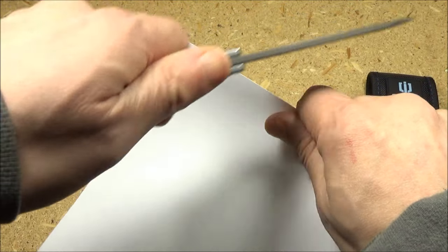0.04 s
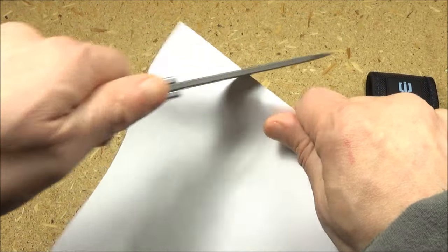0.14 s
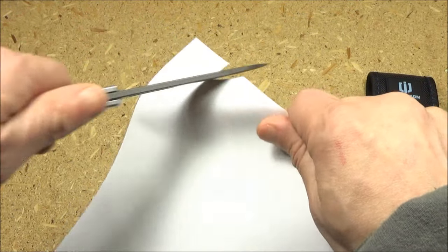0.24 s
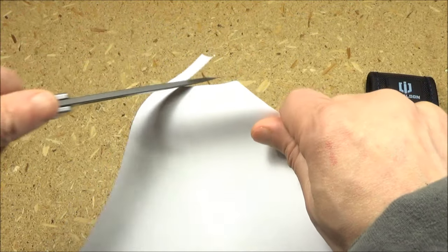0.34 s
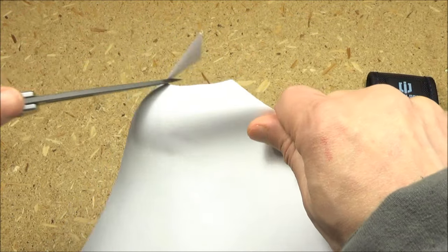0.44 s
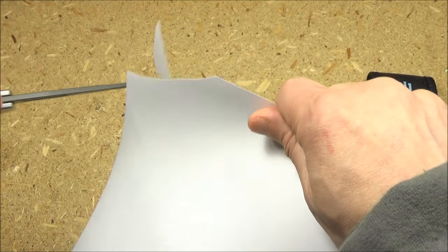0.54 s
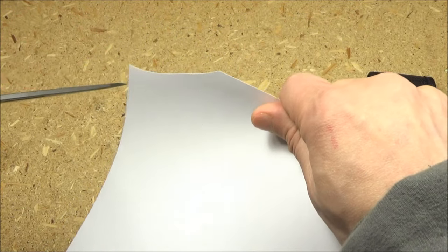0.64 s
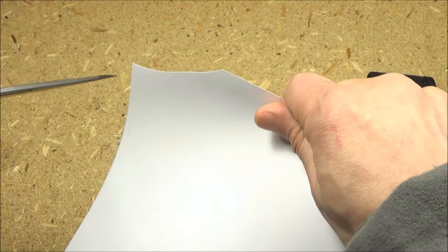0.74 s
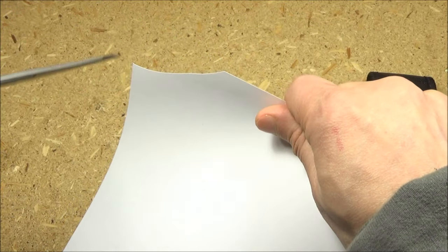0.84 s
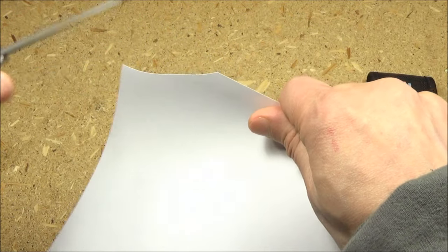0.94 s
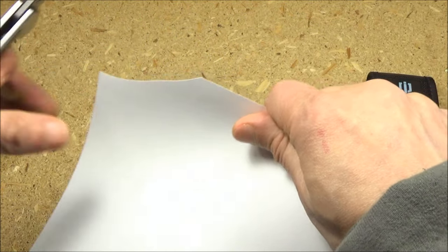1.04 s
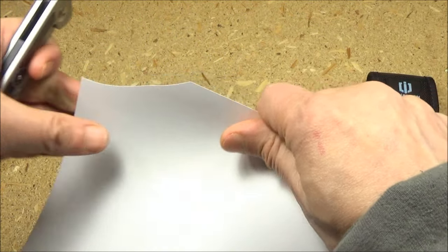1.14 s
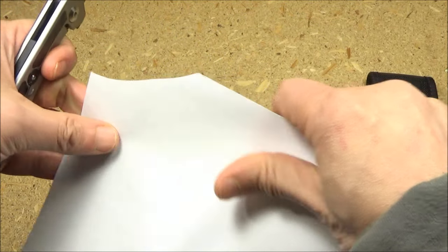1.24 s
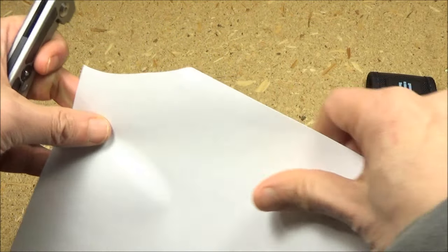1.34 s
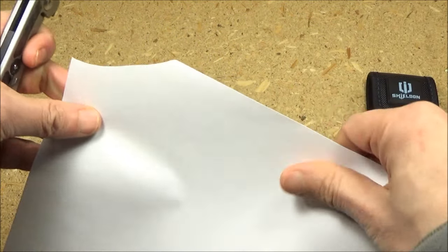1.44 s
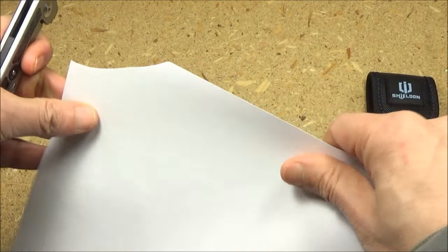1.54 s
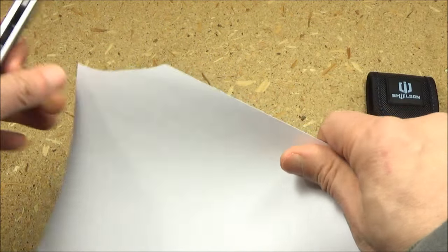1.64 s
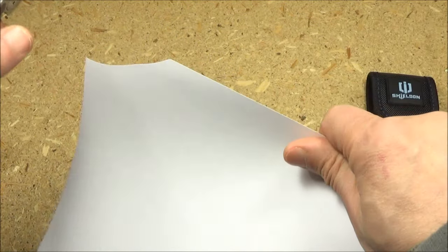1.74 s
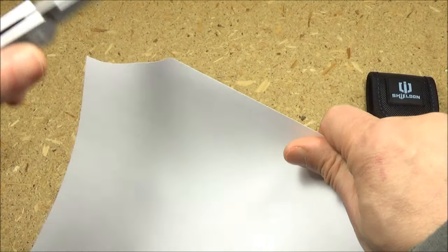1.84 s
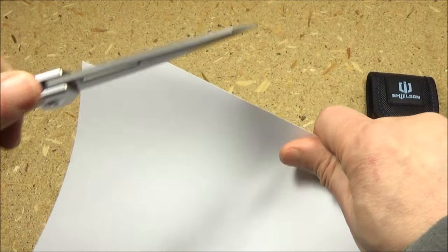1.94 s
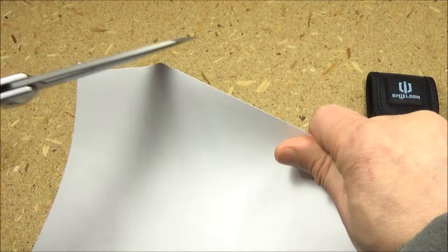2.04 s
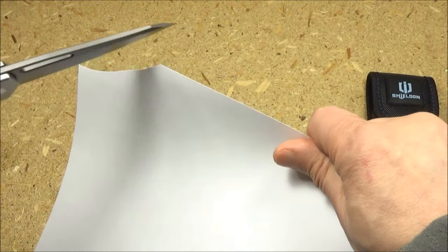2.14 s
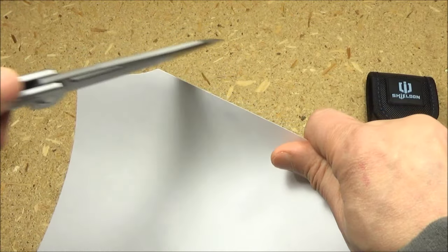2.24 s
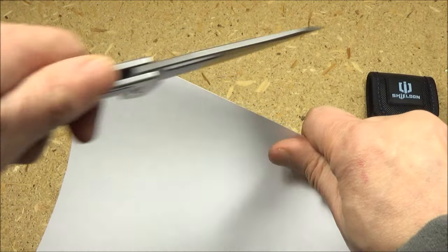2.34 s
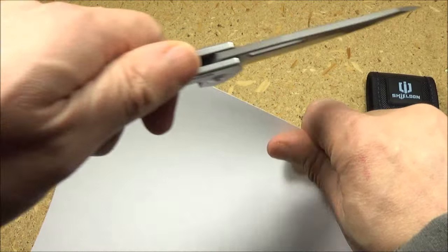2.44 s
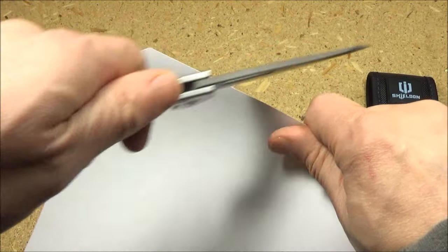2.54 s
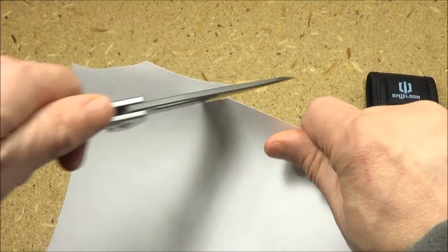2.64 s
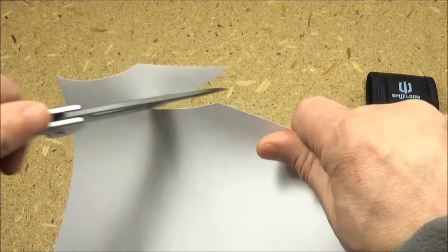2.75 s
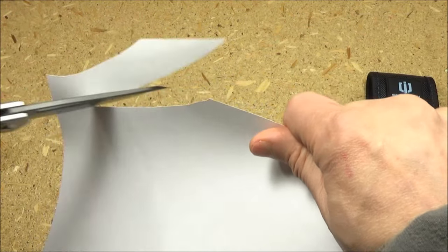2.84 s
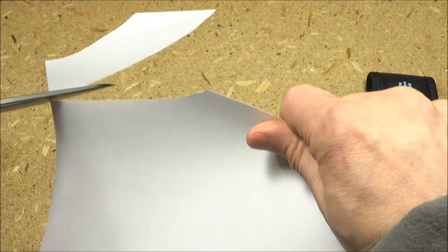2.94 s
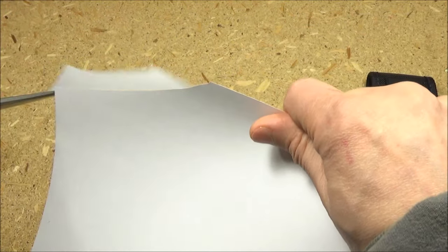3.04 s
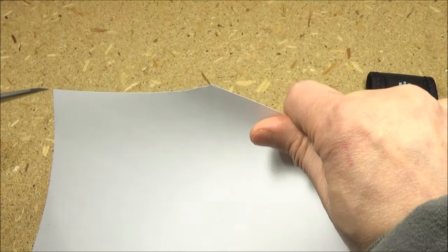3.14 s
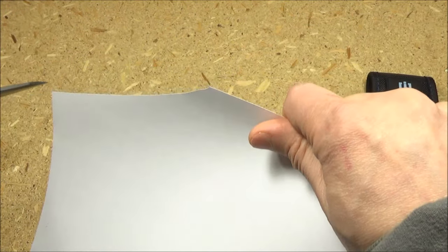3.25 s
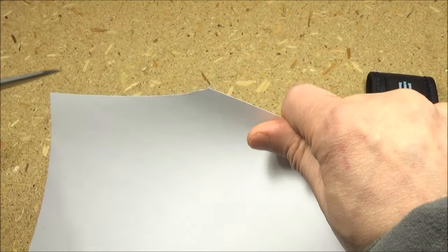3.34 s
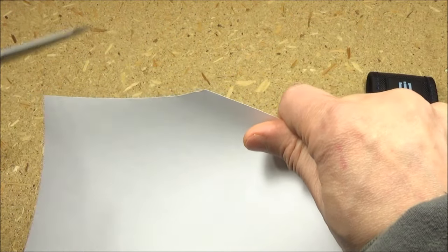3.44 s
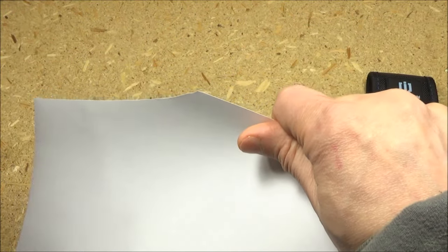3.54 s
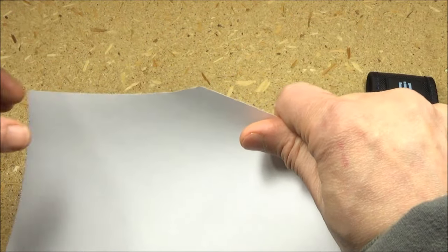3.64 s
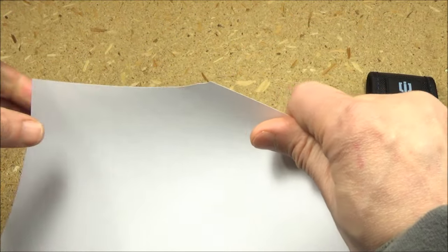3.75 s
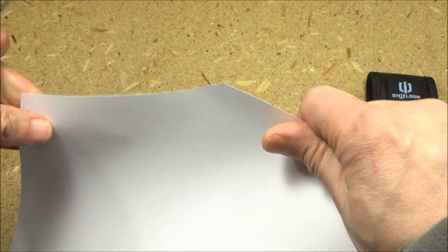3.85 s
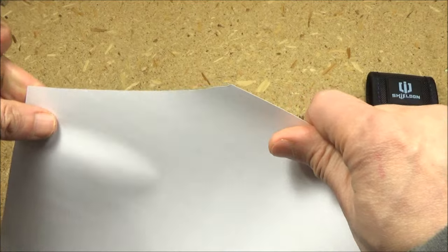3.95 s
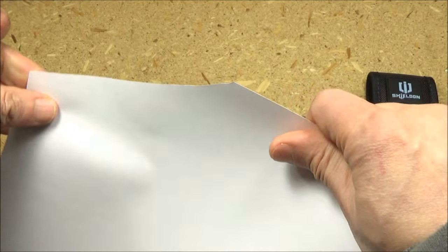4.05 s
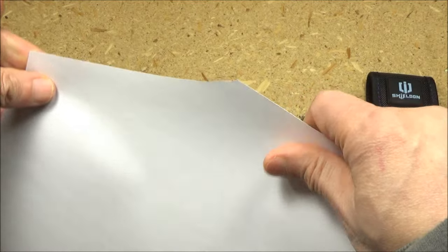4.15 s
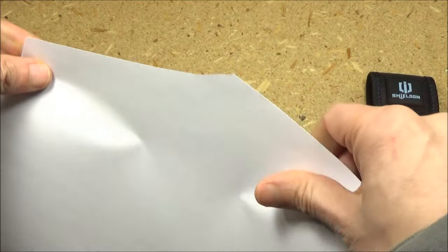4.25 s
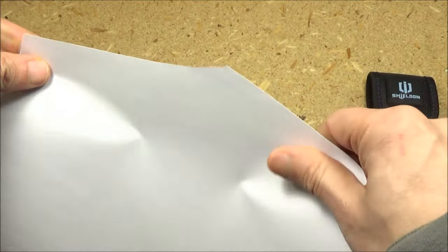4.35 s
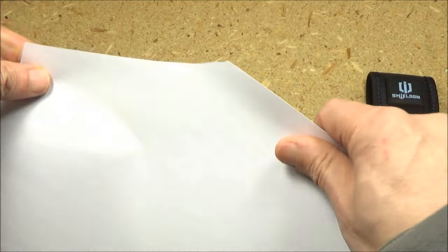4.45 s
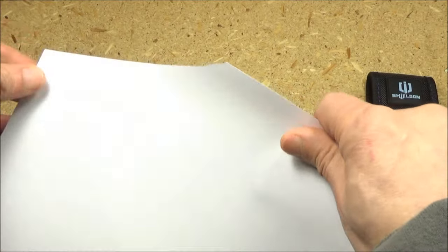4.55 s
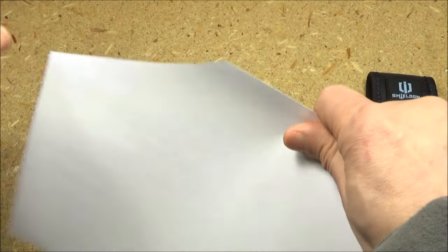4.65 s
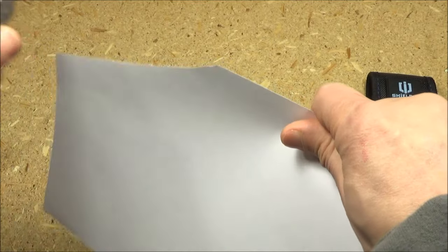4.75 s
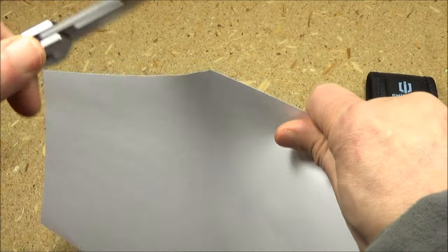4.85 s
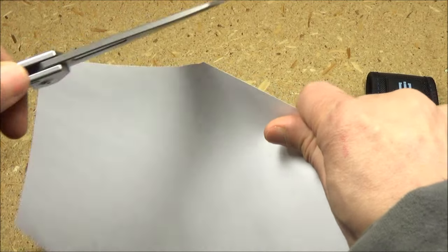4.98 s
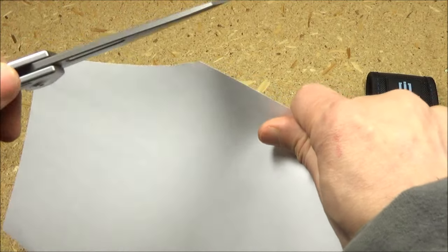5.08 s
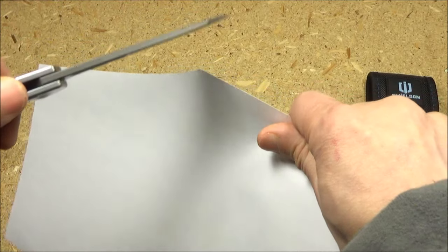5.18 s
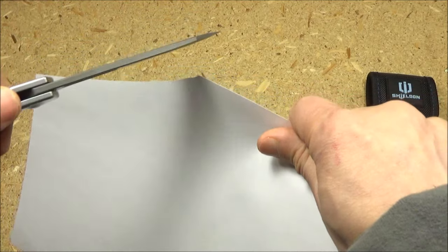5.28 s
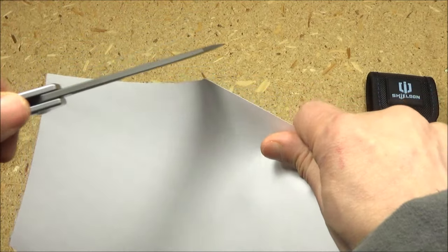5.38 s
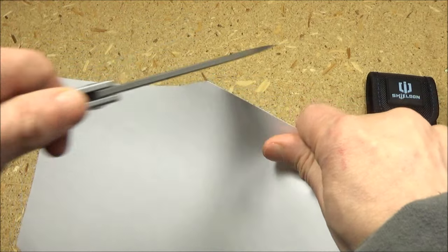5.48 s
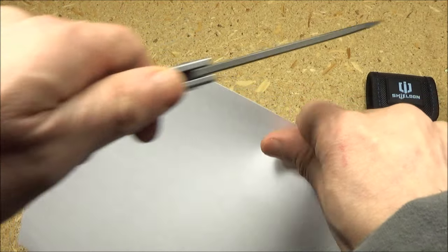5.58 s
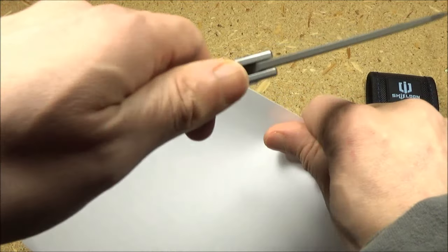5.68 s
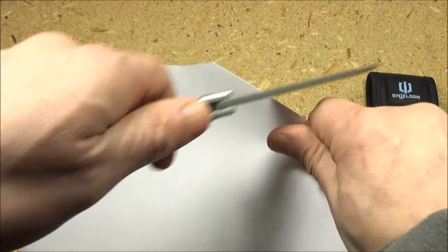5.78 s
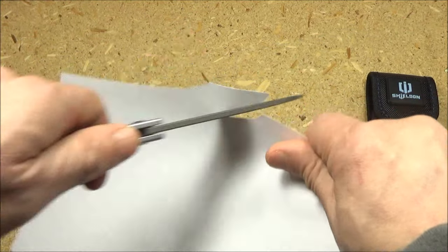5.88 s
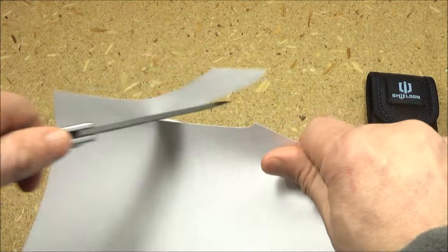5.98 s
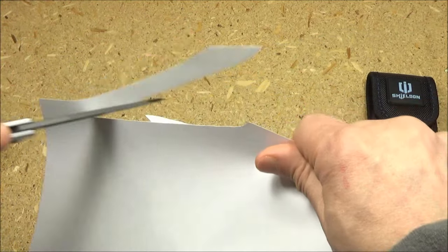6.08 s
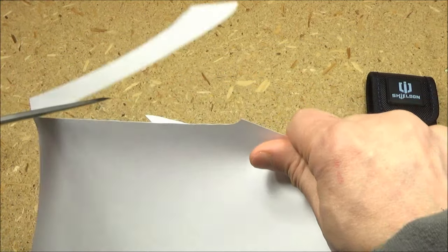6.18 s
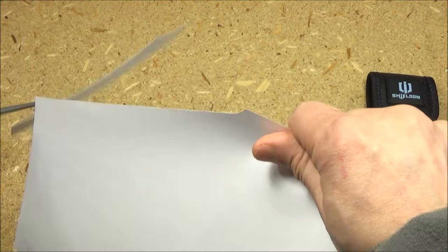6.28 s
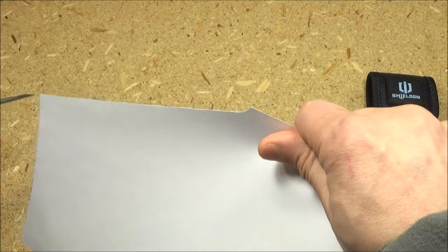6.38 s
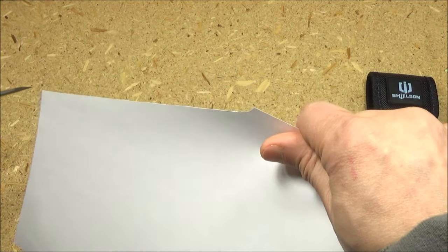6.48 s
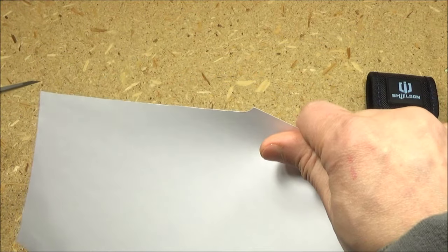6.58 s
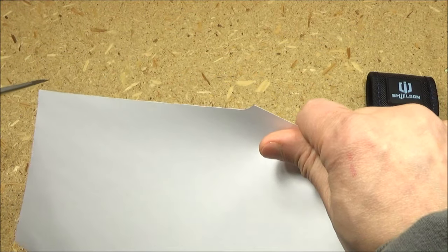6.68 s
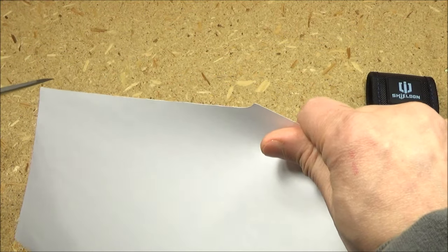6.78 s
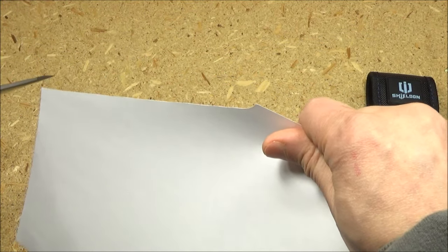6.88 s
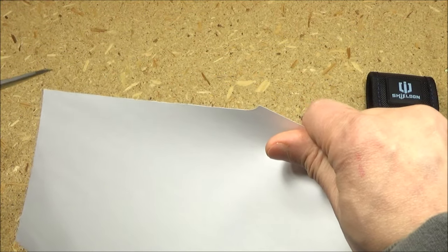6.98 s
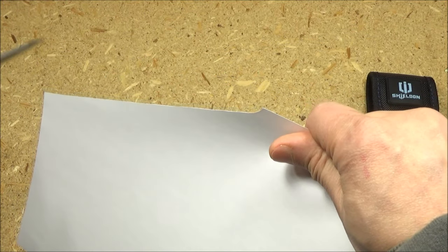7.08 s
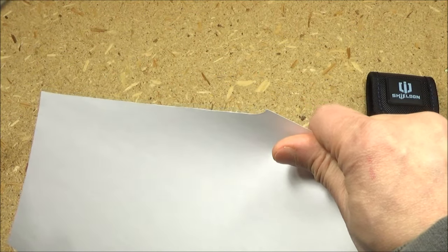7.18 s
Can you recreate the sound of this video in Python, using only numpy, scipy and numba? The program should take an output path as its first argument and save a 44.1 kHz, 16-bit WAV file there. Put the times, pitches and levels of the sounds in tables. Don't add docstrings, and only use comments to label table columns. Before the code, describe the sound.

A knife blade slices a sheet of paper in three crisp, hissing tearing strokes, with rustling, crackling and paper pops between them in a small room.

```python
import sys
import numpy as np
from scipy import signal
from scipy.fft import rfft, irfft, next_fast_len
from scipy.io import wavfile
from scipy.ndimage import uniform_filter1d
from numba import njit

SR = 44100
rng = np.random.default_rng(int(sys.argv[2]) if len(sys.argv) > 2 else 0)


def gain_from_decibels(decibels):
    exponent = np.asarray(decibels, float) / 20
    return 10 ** exponent


def generate_wav(sig):
    pcm = np.round(np.clip(np.atleast_2d(sig).T, -1, 1) * 32767).astype(np.int16)
    wavfile.write(sys.argv[1], SR, pcm)


N = 318402


def rms_one(x):
    return x / np.sqrt(np.mean(x ** 2) + 1e-20)


def in_time(tables, edge_s):
    t, gate = np.arange(N) / SR, 0
    for rows in tables:
        inside_s = np.minimum(t - rows[0][0], rows[-1][0] - t)
        gate = gate + np.clip(inside_s / edge_s + 1, 0, 1)
    s, *columns = np.transpose(np.vstack(tables))
    return np.minimum(gate, 1), [np.interp(t, s, c) for c in columns]


def swells(rows, fall_db_s):
    t = np.arange(0, N + 32, 32) / SR
    start, end, level_db, rise = np.transpose(rows)[:, :, None]
    rising_db = np.abs(rise) * np.maximum(start - t, 0)
    falling_db = fall_db_s * np.maximum(t - end, 0)
    each_db = level_db - rising_db - falling_db
    return np.interp(np.arange(N) / SR, t, np.sqrt(np.sum(gain_from_decibels(2 * each_db), axis=0)))


def drift(rate):
    r = np.exp(-40 * np.pi * rate / SR)
    noise = rng.standard_normal(N // 20 + 2002)
    slow = signal.lfilter([1], [1, -2 * r, r * r], noise)[2000:]
    return np.interp(np.arange(N) / 20, np.arange(len(slow)), rms_one(slow))


def ticks(per_s, spread_db, hiss):
    sizes = gain_from_decibels(spread_db * np.minimum(rng.exponential(1, N), 4)) * rng.choice([-1, 1], N)
    impulses = sizes * (rng.random(N) < per_s / SR)
    return rms_one(rms_one(impulses) + hiss * rng.standard_normal(N))


def colour(x, spectrum, patchy_db, rate, count=3):
    hz, level_db = np.transpose(spectrum)
    bands = int(count * np.log2(hz[-1] / hz[0])) + 1
    edges = np.geomspace(hz[0], min(hz[-1], 19000), bands + 1)
    out = 0
    for k, (low, high) in enumerate(zip(edges, edges[1:])):
        band = signal.sosfilt(signal.butter(2, [low, high], "band", fs=SR, output="sos"), x)
        band_db = np.interp(np.log(low * high) / 2, np.log(hz), level_db)
        out = out + (-1) ** k * band * gain_from_decibels(band_db + patchy_db * drift(rate))
    return rms_one(out)


@njit
def gliding_ring(x, turn, r):
    y = np.zeros(len(x))
    for i in range(2, len(x)):
        y[i] = x[i] - x[i - 2] + 2 * r * np.cos(turn[i]) * y[i - 1] - r * r * y[i - 2]
    return y


# frequency_hz, density_db (per Hz)
ROOM_TONE = [(12, -31), (20, -8.5), (44, -15.5), (84, -10.5), (114, -15), (174, -13.5), (381, -23),
             (415, -18), (534, -28.5), (910, -21), (1430, -32), (6870, -37.5), (7690, -40.5), (8600, -39.5),
             (16400, -36.5)]
# frequency_hz, level_db
WHINES = [(91.5, -70.5), (899.0, -84), (3074, -86), (7407, -82), (15735, -81)]


def room_tone(paper, knee_db=-45, share=0.35, release_db_s=2.5):
    t = np.arange(N) / SR
    level_db = 10 * np.log10(uniform_filter1d(paper ** 2, size=1024) + 1e-12)
    over_db = share * np.maximum(level_db - knee_db, 0)
    ramp = release_db_s * t
    held_db = np.maximum.accumulate(over_db + ramp) - ramp
    air = gain_from_decibels(-61) * colour(rng.standard_normal(N), ROOM_TONE, patchy_db=1.2, rate=3)
    whines = 0
    for hz, level in WHINES:
        whines = whines + gain_from_decibels(level + 1.6 * drift(6)) * np.sin(2 * np.pi * hz * t + 0.57 * drift(2.1))
    return gain_from_decibels(6.0 - held_db) * (air + whines)


# frequency_hz, density_db (per Hz)
FLEX = [(24, -58), (40, -24), (124, -7), (301, 0), (417, -4), (638, -15), (680, 0), (800, -14.5),
        (1040, -50.5), (1760, -120)]
# frequency_hz, density_db (per Hz)
RUSTLE = [(290, -10), (500, -7.5), (888, -6), (1450, 1.5), (1780, -6), (2870, -2), (3360, -11), (4000, -5),
          (5200, -8.5), (8800, -120)]
# frequency_hz, density_db (per Hz)
SLIDE = [(1760, -40), (3000, -13), (3360, -26.5), (4220, 5), (4900, 3.5), (5570, 2), (6510, 5), (8590, 2.5),
         (9690, 7), (10600, 0.5), (12900, 2), (15100, -4), (16100, -20.5), (16400, -35)]
# start_s, end_s, level_db, rise_db_per_s
BENDS = [(0.0, .14, -52, 100), (0.19, .228, -43.5, 200), (0.62, .69, -47, 300), (1.17, 1.3, -60, 96.5),
         (1.316, 1.345, -37.5, 1500), (1.518, 1.56, -46, 893), (1.708, 1.74, -40, 317),
         (1.904, 1.91, -46, 146.5), (2.18, 2.4, -62.5, 260), (2.53, 2.67, -51.5, 76.5),
         (3.285, 3.33, -63, 249), (3.58, 3.67, -67.5, 304), (3.744, 3.75, -58.5, 100.5),
         (3.93, 3.96, -56.5, 393), (4.015, 4.02, -47, 217), (4.232, 4.29, -41.5, 1500),
         (4.33, 4.36, -47, 300), (4.46, 4.53, -43, 599), (4.58, 4.6, -39, 198.5), (4.69, 4.74, -47.5, 400),
         (4.806, 4.87, -45, 1000), (4.92, 4.97, -60, 200), (5.0, 5.2, -62, 100), (5.35, 5.66, -75.5, 99),
         (5.87, 5.9, -58, 30), (6.36, 6.37, -46.5, 301)]
# start_s, end_s, rustle_db, skin_over_rustle_db, rise_db_per_s
GUIDING = [(0.0, 0.11, -57.5, -1.5, 290), (0.127, 0.11, -54.5, -3, 194), (0.175, 0.2, -45.5, -2.5, 128),
           (0.606, 0.6, -37, 2, 300), (0.647, 0.67, -33, -16, 800), (0.927, 1.26, -70, -1.5, 94),
           (1.998, 2.23, -62, -4.5, 200), (2.183, 2.23, -53.5, -4, 328), (2.21, 2.4, -60, -5, 200),
           (2.439, 2.7, -49, -8, 900), (2.53, 2.62, -46, -7.5, 303), (3.088, 3.126, -43.5, -9, 303),
           (3.236, 3.2, -71.5, -1, 900), (3.3, 3.327, -58, -6.5, 4000), (3.56, 3.93, -60, -6.5, 249),
           (5.013, 5.08, -60, -1.5, 200), (5.302, 5.74, -71, -1, 197), (5.589, 5.6, -60.5, -5, 805),
           (5.66, 6.7, -68, -5, 90), (5.84, 5.84, -58.5, -0.3, 106), (6.345, 6.36, -49, 7, 300),
           (5.215, 5.2, -63.5, 1, 203)]
# start_s, end_s, rustle_db, skin_over_rustle_db, rise_db_per_s
REGRIPS = [(1.199, 1.218, -52, -1.5, 235), (1.259, 1.284, -48, -1.5, 114), (1.32, 1.331, -51, 1, 1497),
           (1.339, 1.388, -43.5, 7, 247.5), (1.42, 1.47, -45.5, 8.5, 299.5), (1.549, 1.575, -42.5, 12, 250),
           (1.659, 1.692, -48, 11.5, 800), (1.722, 1.728, -46, 4, 300), (1.699, 1.897, -41, 0.5, 148.5),
           (3.908, 3.941, -51, 1, 1998), (4.03, 4.083, -54.5, 3, 300), (3.969, 3.958, -31.5, -11.5, 901.5),
           (4.124, 4.17, -49.5, -3.5, 2000), (4.207, 4.239, -44, 4.5, 120), (4.218, 4.278, -49, -4, 1500),
           (4.328, 4.369, -46.5, 6, 200), (4.442, 4.494, -40, 6.5, 899.5), (4.544, 4.57, -34.5, 0, 282.5),
           (4.621, 4.635, -52.5, 15.5, 201.5), (4.688, 4.762, -54, 4.5, 204), (4.82, 4.846, -42, -2.5, 700),
           (4.923, 4.943, -51, 1, 500)]
# start_s, end_s, level_db, rise_db_per_s
TAPS = [(3.2965, 3.302, -43.5, 6000), (3.72, 3.755, -53, 250), (6.535, 6.547, -50.5, 5000),
        (1.316, 1.33, -40, 5000), (4.124, 4.135, -47.5, 4000), (2.524, 2.53, -43, 4000),
        (3.948, 3.975, -38.5, 900)]


def handling():
    hush_s = 0.0059
    resting, _ = in_time([[(c[0][0] - hush_s, 0), (c[-1][0], 0)] for c in CUTS], edge_s=0.0013)
    clumps = drift(28)
    flex = gain_from_decibels(1.6 * clumps) * colour(rng.standard_normal(N), FLEX, patchy_db=1.8, rate=12)
    folds = ticks(2500 * gain_from_decibels(2.7 * clumps), spread_db=5.0, hiss=1.29)
    skin = ticks(4000 * gain_from_decibels(2.2 * clumps), spread_db=3.5, hiss=0.92)
    rustle = gain_from_decibels(1.3 * clumps) * colour(folds, RUSTLE, patchy_db=2.5, rate=12)
    slide = gain_from_decibels(0.51 * clumps) * colour(skin, SLIDE, patchy_db=3.0, rate=14, count=6)

    dull = signal.butter(4, 1700, fs=SR, output="sos")
    body = gain_from_decibels(-6.5) * signal.sosfilt(dull, rustle[::-1])

    edge, edge_width_hz = 0, 450
    for hz in (4600, 7500, 9500):
        turn = np.full(N, 2 * np.pi * hz / SR)
        edge = edge + rms_one(gliding_ring(skin[::-1].copy(), turn, np.exp(-np.pi * edge_width_hz / SR)))
    edge = edge * (np.digitize(np.arange(N) / SR, (2.4, 3.8)) == 1)

    def skin_swells(rows):
        return swells([(a, b, db + skin_db, rise) for a, b, db, skin_db, rise in rows], fall_db_s=219)

    guided, gripped = skin_swells(GUIDING), skin_swells(REGRIPS)
    rustling = swells([(a, b, db, rise) for a, b, db, _, rise in GUIDING + REGRIPS], fall_db_s=201)
    out = swells(BENDS, fall_db_s=134) * (flex + body)
    out += rustling * rustle
    out += swells(TAPS, fall_db_s=800.5) * (rustle + gain_from_decibels(-6.5) * slide)
    out += (guided + gripped) * slide
    out += gain_from_decibels(-5) * guided * edge
    return (1 - resting) * out


# start_s, peak_db, pitch_hz
SETTLING = [(0.115, -39.5, 1240), (0.843, -45.5, 10000), (2.613, -41, 9300), (3.425, -57, 763.7),
            (3.9105, -40, 781), (5.141, -43.5, 1490), (5.5824, -48, 950), (5.65, -49, 1215),
            (5.7384, -44, 1002), (5.8007, -42.5, 1202)]
# start_s, peak_db, pitch_hz, brightness_db
SNAPS = [(0.2408, -13.5, 1560, -19.5), (0.591, -14.5, 7970, -3), (0.601, -18, 7850, -5.5),
         (0.61, -9, 8400, -15), (0.647, -15, 1540, -1.5), (0.6564, -13, 1410, -26), (0.813, -32, 9600, -19),
         (1.263, -30, 7640, -11), (1.3139, -28, 999, -20), (1.3264, -23.5, 1445, -29.5),
         (1.7962, -21.5, 1157, -12), (1.556, -26.5, 1200, -27), (1.373, -22.5, 4400, -20),
         (1.716, -27, 1300, -25), (2.032, -38.5, 1440, -38), (2.5236, -30, 1420, -7),
         (2.7135, -10, 1300, -7), (3.2965, -31, 1360, -3), (3.6885, -36, 4500, -26),
         (3.9359, -27, 1527, -18), (4.123, -32.5, 1340, -16), (4.541, -19, 6000, -7),
         (4.5506, -14.5, 2700, -1), (4.565, -15.5, 3000, -3.5), (4.584, -12.5, 1480, -22),
         (4.9285, -38.5, 5370, -19), (5.917, -33.5, 2110, -31), (5.9301, -11.5, 1330, -14),
         (6.5345, -35.5, 2660, -6), (6.571, -44, 9000, -14)]


def snaps():
    out, t = np.zeros(N + 2000), np.arange(2000) / SR
    rows = SNAPS + [(*row, -4) for row in SETTLING]
    bursts = rng.standard_normal((len(rows), 2000))
    bright = signal.butter(3, [3300, 10000], "band", fs=SR, output="sos")
    for (s, peak_db, hz, bright_db), burst in zip(rows, bursts):
        burst = burst * np.exp(-t / 0.0046) * (1 - np.exp(-t / 0.0001))
        r = np.exp(-np.pi * .8 * hz / SR)
        poles = [1, -2 * r * np.cos(2 * np.pi * hz / SR), r * r]
        body = signal.lfilter([1, 0, -1], poles, burst)
        body = signal.lfilter([1], poles, body)
        tick = signal.sosfilt(bright, burst)
        thump_db = -17.5 - 0.1 * peak_db
        thump = gain_from_decibels(thump_db) * np.sin(2 * np.pi * 290 * t) * np.exp(-t / 0.006)
        snap = 1.08 * body / np.abs(body).max() + gain_from_decibels(bright_db + 9.0) * tick / np.abs(tick).max() + thump
        at = round(s * SR)
        out[at:at + 2000] += gain_from_decibels(peak_db - 5.0) * snap
    return out[:N]


def flap_modes(width_hz, wander, swell_db, tilt_db, count=14):
    out, fibres = 0, ticks(8000, spread_db=8.0, hiss=0.75)
    for k, hz in enumerate(np.linspace(2500, 12800, count)):
        turn = 2 * np.pi * hz * (1 + wander * drift(2.2)) / SR
        ring = gliding_ring(fibres, turn, np.exp(-np.pi * width_hz * (1 + hz / 20000) / SR))
        out = out + (-1) ** k * gain_from_decibels(swell_db * drift(1.25) + tilt_db * k / count) * rms_one(ring)
    return rms_one(out)


# start_s, end_s, from_hz, to_hz, level_db (against tearing)
RIDGES = [(.26, .43, 5900, 4800, -9), (.39, .57, 2600, 5600, -9), (.37, .47, 9300, 8000, -6),
          (.52, .63, 8900, 7800, -3), (2.71, 2.83, 9000, 10000, -4), (2.71, 2.79, 12200, 13200, -6),
          (2.73, 2.96, 4600, 6200, -1), (2.77, 2.91, 6700, 7800, -8), (2.84, 3.09, 4200, 4300, -7),
          (2.88, 2.95, 9300, 9600, -4), (2.94, 3.1, 2700, 3300, -8), (2.83, 3.0, 11600, 12200, -9),
          (3.01, 3.09, 8000, 8600, -6), (2.96, 3.08, 4300, 5600, -8), (5.965, 6.025, 13000, 9500, -5),
          (5.99, 6.16, 9300, 8700, -3), (6.0, 6.16, 4600, 5500, -5), (6.19, 6.36, 9800, 8400, -8),
          (6.1, 6.24, 3400, 2200, -14), (.26, .34, 12000, 12800, -9), (.25, .33, 8500, 9500, -9),
          (.48, .6, 11000, 10000, -9), (6.17, 6.3, 5200, 5600, -12)]


def ridges(width_share=.07, level_db=1.0):
    out, fibres = np.zeros(N), ticks(12000, spread_db=-3.0, hiss=0.26)
    for start, end, from_hz, to_hz, ridge_db in RIDGES:
        a, b = round(start * SR), round(end * SR)
        turn = 2 * np.pi * np.linspace(from_hz, to_hz, b - a) / SR
        r = np.exp(-np.pi * (380 + width_share * to_hz) / SR)
        ring = gliding_ring(gliding_ring(fibres[a:b], turn, r), turn, r)
        out[a:b] += gain_from_decibels(ridge_db + level_db) * np.sqrt(np.hanning(b - a)) * rms_one(ring)
    return out


# time_s, tearing_db, flap_looseness_db, tautness_db
CUTS = [
    [(0.241, -21, -2, -2), (0.303, -22, -4.5, -4), (0.363, -21, -29.5, 2.5), (0.411, -20, -38, -6),
     (0.47, -20.5, -19.5, -14), (0.537, -20.5, 2.5, -18), (0.583, -23, 5, -4.5), (0.614, -33.5, 16.5, -8.5)],
    [(2.712, -32.5, 4.5, 1.5), (2.718, -18.5, -15.5, 5), (2.786, -21.5, -25, -2), (2.838, -20.5, -14.5, 5),
     (2.926, -21, -7, -3), (2.99, -22, -0.5, -1.5), (3.062, -20.5, 2.5, 6), (3.072, -17.5, 3, -8)],
    [(5.931, -23.5, 1, 7.5), (5.947, -16, -8.5, -5.5), (5.983, -22.5, -43, -4.5), (6.045, -20, -49, 3),
     (6.099, -21.5, -28.5, 4), (6.15, -22, -2.5, -2), (6.249, -21.5, -4.5, -33),
     (6.338, -20.5, -5.5, -17.5)],
]
# flap_from_hz, flap_to_hz, sizzle_from_db, sizzle_to_db
STROKES = [
    (1480, 1370, 11.5, -4),
    (1300, 2410, 9, -5),
    (1580, 1670, 11, 5.5),
]
# frequency_hz, density_db (per Hz)
TEARING = [(59, -50), (100, -42), (375, -6.5), (506, -9), (728, -6), (1140, 3), (3040, -3.5), (5070, 2.5),
           (6550, -5), (7450, 1), (9420, -5.5), (15100, -14), (16400, -27)]
RING_WIDTH_HZ = (670, 2600, 5600)


def cut():
    gate, (tear_db, loose_db, taut_db) = in_time(CUTS, edge_s=0.002)
    strokes = [[(c[0][0], s[0], s[2]), (c[-1][0], s[1], s[3])] for c, s in zip(CUTS, STROKES)]
    _, (flap_hz, sizzle_db) = in_time(strokes, edge_s=1)
    judder = gain_from_decibels(0.78 * drift(58))
    fibres = ticks(6000, spread_db=4.5, hiss=0.69)
    bed = gain_from_decibels(-3.5) * colour(fibres, TEARING, patchy_db=-0.5, rate=26, count=4)
    bed = bed + gain_from_decibels(-9) * flap_modes(width_hz=380, wander=.03, swell_db=2.2, tilt_db=-3)
    top = signal.sosfilt(signal.butter(2, 10500, "high", fs=SR, output="sos"), bed)
    low = signal.sosfilt(signal.butter(2, 2300, fs=SR, output="sos"), bed)
    dulling = gain_from_decibels(0.13 * np.minimum(loose_db, 0))
    out = bed + (gain_from_decibels(sizzle_db) - 1) * top + (dulling - 1) * low

    centres = flap_hz, np.full(N, 4650), np.full(N, 7910)
    levels = loose_db, taut_db, taut_db + 1
    for hz, ring_db, width_hz in zip(centres, levels, RING_WIDTH_HZ):
        turn, r = 2 * np.pi * hz / SR, np.exp(-np.pi * width_hz / SR)
        drive = ticks(7000, spread_db=7.5, hiss=1.0)
        ring = gliding_ring(gliding_ring(drive, turn, r), turn, r)
        out += gain_from_decibels(ring_db - 7.5) * rms_one(ring)
    out += ridges()
    evened = out / np.sqrt(uniform_filter1d(out ** 2, size=900))
    return gate * gain_from_decibels(tear_db) * judder * evened


def cut_flex():
    gate, (tear_db, *_) = in_time(CUTS, edge_s=0.0086)
    bite = 1 + swells([(c[0][0], c[0][0] + 0.0082, 13, 4000) for c in CUTS], fall_db_s=700)
    shudder = colour(rng.standard_normal(N), FLEX, patchy_db=2.5, rate=9)
    return gate * bite * gain_from_decibels(tear_db - 29) * shudder


# start_s, peak_db, pitch_hz
POPS = [(0.6123, -15.5, 1510), (0.6515, -8.5, 4120), (1.314, -20.5, 4650), (1.327, -20, 2300),
        (1.4094, -25.5, 1500), (1.557, -27, 1300), (3.96, -10, 5270), (3.9707, -11.5, 3760),
        (4.5108, -17.5, 1580), (4.526, -19.5, 1700), (4.558, -13.5, 2904), (4.561, -14, 2140),
        (4.818, -10.5, 4030)]


def pops(cycles=0.72):
    out, t = np.zeros(N), np.arange(-100, 100) / SR
    for s, peak_db, hz in POPS:
        swing = np.cos(2 * np.pi * hz * t + 0.47) * np.exp(-(t * hz / cycles) ** 2)
        sharp_edge = np.cos(2 * np.pi * 1.8 * hz * t) * np.exp(-(t * 1.4 * hz / cycles) ** 2)
        at = round((s + 0.000894) * SR)
        out[at - 100:at + 100] += gain_from_decibels(peak_db + 1.0) * (swing + 0.25 * sharp_edge)
    return out


# start_s, peak_db, pitch_hz
TICKS = [(0.7923, -43.5, 5040), (0.903, -49, 10400), (0.9298, -51.5, 7700), (0.942, -53, 8500),
         (0.9532, -49, 9100), (1.0118, -55, 10300), (1.0322, -51, 4690), (1.0676, -48, 9640),
         (2.4658, -46, 9420), (2.5136, -43, 11000), (2.5238, -31, 11500), (2.581, -44, 11500),
         (2.588, -37, 11000), (2.622, -39, 11500), (2.637, -42.5, 11000), (2.651, -37.5, 10500),
         (2.681, -43.5, 12200), (3.169, -47.5, 12000), (3.2395, -54, 9000), (3.2634, -45, 4460),
         (3.3393, -42, 4440), (3.5583, -54, 4440), (3.5812, -44, 4849), (3.6265, -46, 4750),
         (3.7119, -47, 4850), (3.884, -48.5, 6560), (3.9655, -25.5, 8950), (4.407, -42.5, 8000),
         (4.43, -36, 9500), (4.859, -34.5, 10500), (4.948, -42, 10000), (5.1969, -51, 8210),
         (5.2114, -45, 7000), (5.7092, -44.5, 8810), (5.716, -49.5, 6117), (6.581, -50, 10000),
         (6.586, -52.5, 10570), (0.657, -16, 7300)]


def crease_ticks(width_share=0.58, decay_ms=1.8):
    out, t = np.zeros(N + 3000), np.arange(3000) / SR
    for (s, peak_db, hz), burst in zip(TICKS, rng.standard_normal((len(TICKS), 3000))):
        edges = [hz * (1 - width_share / 2), min(hz * (1 + width_share / 2), 18000)]
        band = signal.butter(2, edges, "band", fs=SR, output="sos")
        tick = signal.sosfilt(band, burst * np.exp(-t * 1000 / decay_ms))
        at = round(s * SR)
        out[at:at + 3000] += gain_from_decibels(peak_db) * tick / np.abs(tick).max()
    return out[:N]


# start_s, end_s, level_db, rise_db_per_s
CRUMPLES = [(0.66, 0.7, -43.5, 502), (1.4, 1.415, -45, 600), (1.7, 1.74, -43, 300),
            (1.78, 1.82, -43.5, 300), (1.87, 1.92, -44, 300), (3.975, 4.012, -37, 600),
            (4.228, 4.29, -42, 1500), (4.33, 4.37, -46, 200.5), (4.47, 4.5, -39, 302),
            (4.59, 4.62, -41.5, 399), (4.68, 4.74, -47, 400), (4.82, 4.87, -43, 402),
            (4.89, 4.9, -51.5, 300), (6.345, 6.39, -44, 502.5)]


def crumples():
    band = signal.butter(4, (600, 1800), "band", fs=SR, output="sos")
    lumps = signal.sosfilt(band, ticks(1400, spread_db=4.0, hiss=0.7))
    return swells(CRUMPLES, fall_db_s=403) * rms_one(lumps)


# start_s, peak_db, pitch_hz
KNOCKS = [(1.327, -31, 280), (1.515, -36.5, 300), (1.727, -32.5, 330), (3.166, -42.5, 330),
          (3.935, -34.5, 221), (3.995, -28.5, 347), (4.014, -34.5, 160), (4.123, -42, 167),
          (4.19, -36, 300), (4.228, -26.5, 245), (4.245, -28.5, 170), (4.282, -30.5, 230),
          (4.345, -45, 200), (4.46, -36, 200), (4.545, -34.5, 280), (4.582, -25.5, 221),
          (4.695, -30.5, 330), (4.808, -30, 250), (4.845, -29.5, 330), (4.873, -39, 200), (5.934, -27, 300)]


def knocks(decay_cycles=2.2, rise_ms=1.8):
    out, t = np.zeros(N + 3000), np.arange(3000) / SR
    for s, peak_db, hz in KNOCKS:
        phase = 2 * np.pi * hz * t
        swings = np.sin(phase) + 0.68 * np.sin(1.7 * phase) - 0.4 * np.sin(0.55 * phase)
        shape = np.exp(-t * hz / decay_cycles) * (1 - np.exp(-t * 1000 / rise_ms))
        at = round(s * SR)
        out[at:at + 3000] += gain_from_decibels(peak_db - 1.5) * swings * shape
    return out[:N]


def room(x, t60_s=0.24, wall_cut_hz=11000):
    size = next_fast_len(N + SR)
    turn = 2j * np.pi * np.arange(size // 2 + 1) / size
    dull = np.exp(-2 * np.pi * wall_cut_hz / SR)
    wall = (1 - dull) / (1 - dull * np.exp(-turn))
    echoes = 0
    for k, lag in enumerate(np.geomspace(.0071, .031, 10) * SR):
        loop = gain_from_decibels(-60 * lag / SR / t60_s) * wall * np.exp(-turn * round(lag))
        echoes = echoes + (-1) ** k * loop / (1 - loop)
    return irfft(rfft(x, size) * echoes, size)[:N]


# frequency_hz, level_db
PORT_DIFFERENCE = [(60, -26), (600, -1), (1200, -31), (4000, -36), (5500, 6), (10500, -5.5), (13000, -17)]


def scene():
    blade = cut() + cut_flex() + snaps() + pops() + crease_ticks() + knocks()
    hands = handling() + crumples()
    diffuse = room(gain_from_decibels(-23.0) * blade + gain_from_decibels(-25.5) * hands) + room_tone(blade + hands)
    late = np.concatenate([np.zeros(310), diffuse[:-310]])
    side = gain_from_decibels(-54.5) * colour(late, PORT_DIFFERENCE, patchy_db=11.0, rate=9, count=4)
    mid = blade + hands + diffuse
    return np.array([mid + side, mid - side])


def top_cut(x):
    return signal.sosfilt(signal.butter(12, 16800, fs=SR, output="sos"), x)


def record(dry):
    limited = 0.38 * np.tanh(dry / 0.42)
    low_pass = signal.cheby2(24, 45, 16060, fs=SR, output="sos")
    mix = signal.sosfilt(low_pass, limited)
    return top_cut(mix)


dry = scene()
out = record(dry)
generate_wav(out)
```